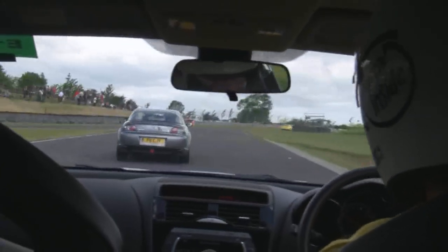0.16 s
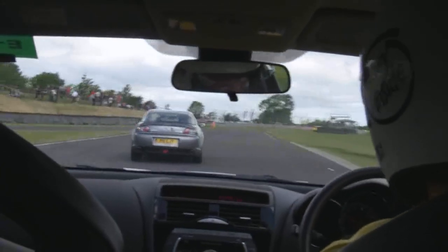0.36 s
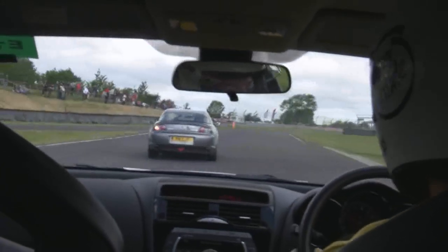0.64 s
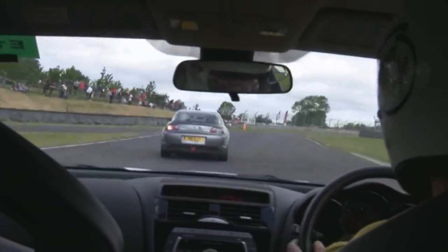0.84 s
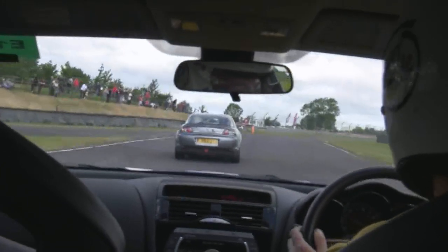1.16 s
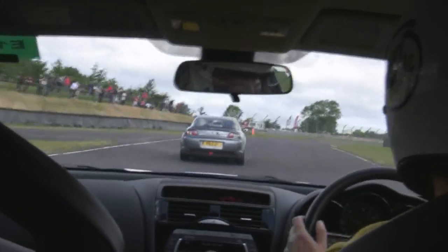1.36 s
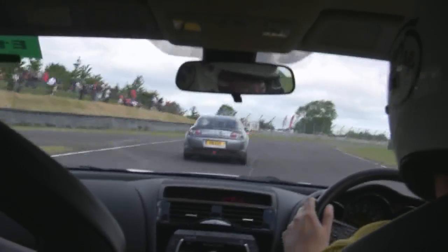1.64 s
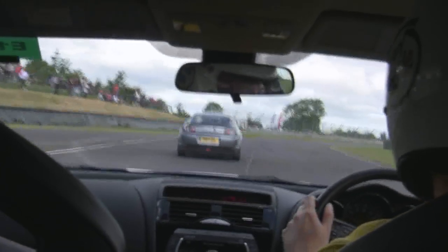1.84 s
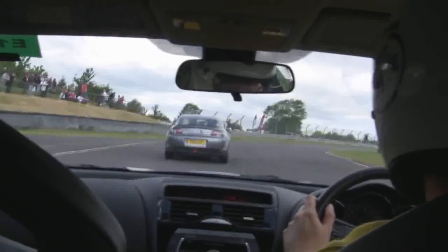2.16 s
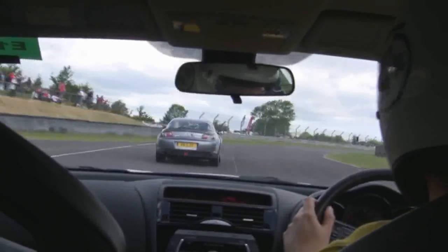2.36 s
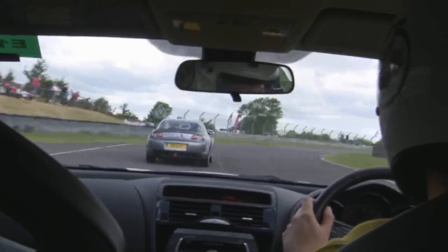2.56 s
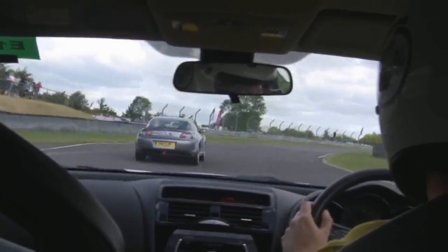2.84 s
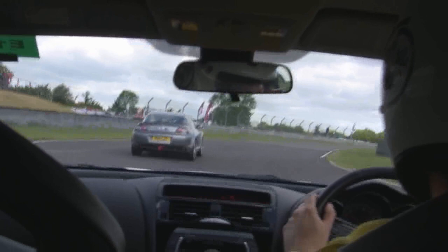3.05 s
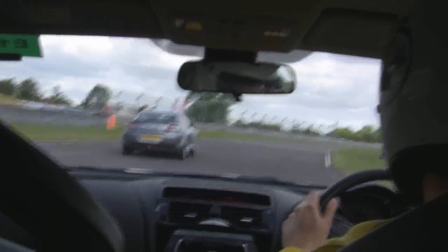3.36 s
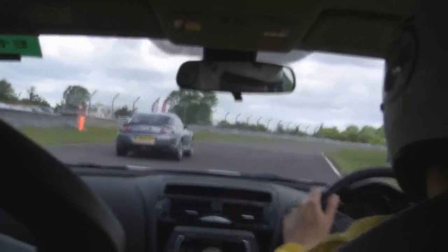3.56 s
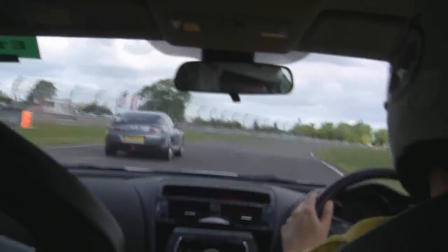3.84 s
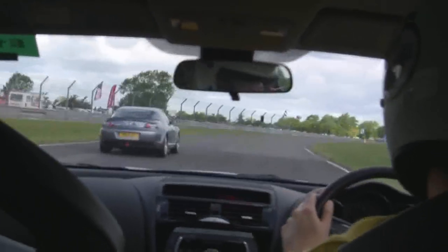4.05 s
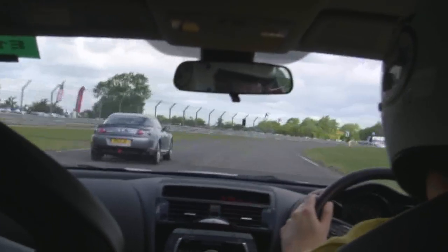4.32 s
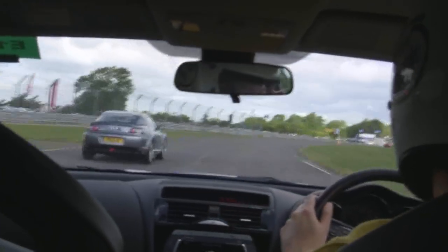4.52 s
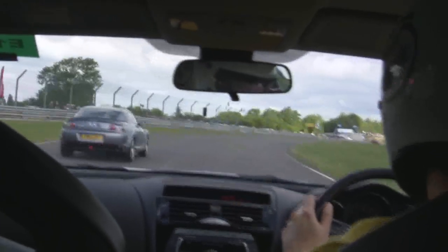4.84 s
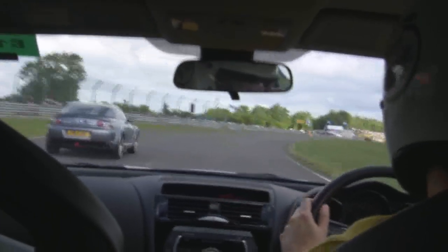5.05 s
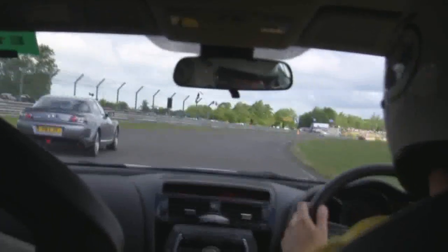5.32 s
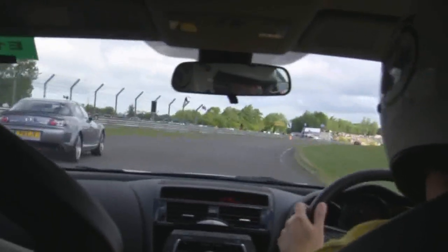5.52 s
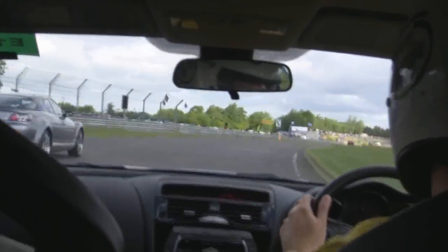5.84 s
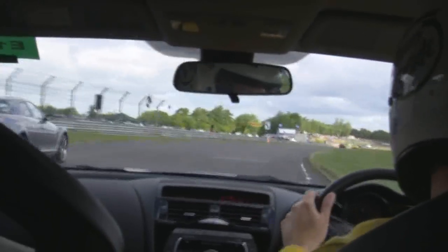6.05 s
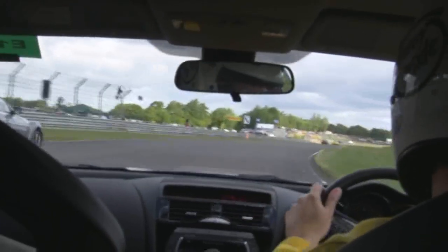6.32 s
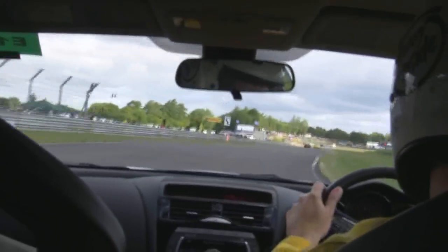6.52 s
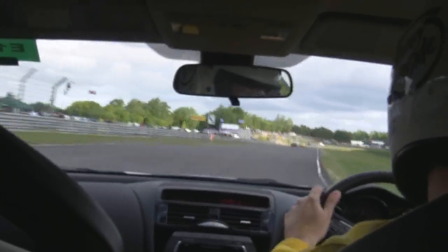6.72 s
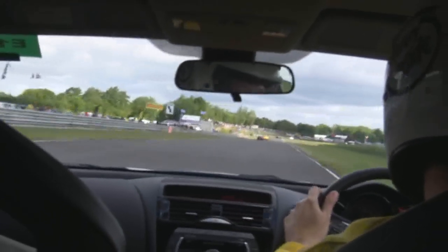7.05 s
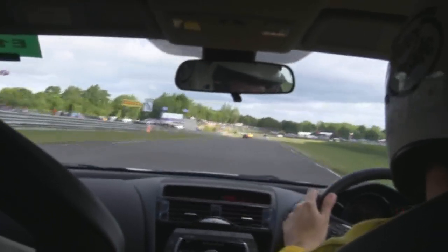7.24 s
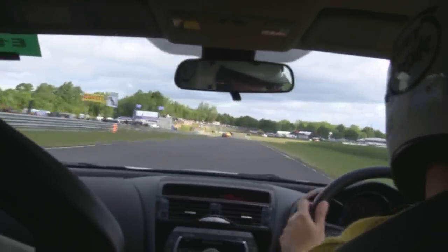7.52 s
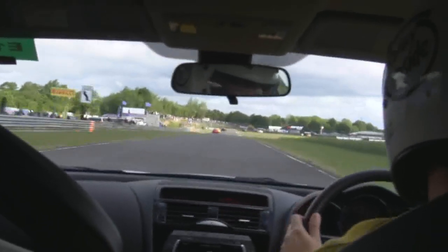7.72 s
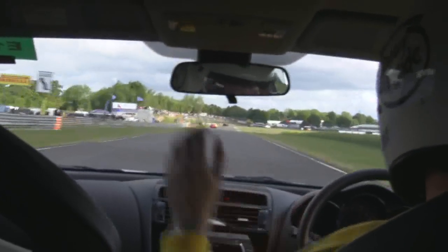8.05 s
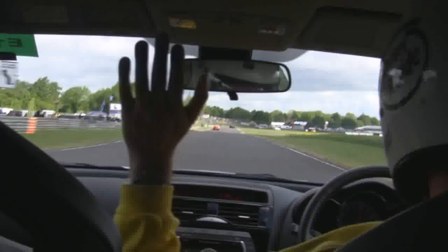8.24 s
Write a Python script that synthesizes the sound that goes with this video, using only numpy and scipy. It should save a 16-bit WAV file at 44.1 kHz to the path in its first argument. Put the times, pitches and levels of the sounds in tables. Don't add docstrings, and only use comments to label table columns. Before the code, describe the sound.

Inside the closed cabin of a car lapping a circuit, close stereo microphone behind the seats. From 0 s a smooth, low engine drone eases, then sinks sharply around 0.5-1 s as the driver lifts for a bend, leaving floor rumble and wind hiss more exposed. From about 1.1 s power returns and the pitch climbs steadily in one gear to the end, roughly two thirds higher, swelling and changing colour through resonances, with a small dip near 6.7 s. Low road boom, fluttering wheel thump and body roar grow; bumps surge near 3.6 and 5.1 s. Dry trim ticks scatter until 5.5 s, sharpest around 2.1 and 4-4.4 s. Driveline hums join around 3.2-4.5 and 6.7-7.7 s. Gusty hiss brightens around 4-5.5 s, with air thuds near 4.3 and 6.9 s. It cuts off still accelerating at about 8.4 s.

```python
import sys
import numpy as np
from scipy import signal
from scipy.fft import rfft, irfft, next_fast_len
from scipy.io import wavfile
from scipy.ndimage import uniform_filter1d

SR = 44100
rng = np.random.default_rng(int(sys.argv[2]) if len(sys.argv) > 2 else 0)


def to_linear_factor(level_db):
    exponent = np.asarray(level_db, float) / 20
    return 10 ** exponent


def file_out(sig):
    cols = np.atleast_2d(sig).T
    lim = np.clip(cols, -1, 1)
    pcm = np.round(lim * 32767).astype(np.int16)
    wavfile.write(sys.argv[1], SR, pcm)


N = 369999

# (time [s], firing rate [Hz])
ENGINE_SPEED = [(0.0, 153.7), (0.5, 158.8), (0.75, 157.8), (1.0, 153.8), (1.25, 154), (1.75, 160.5),
                (2.25, 167.9), (2.75, 174.3), (3.25, 182.8), (4.0, 195.2), (4.5, 202.3), (5.0, 208.1),
                (5.5, 215.6), (6.25, 227.5), (7.25, 243.2), (8.0, 251.8), (8.25, 255.4)]


def engine():
    # (multiple of firing rate [-], level [dB], share of the throttle change [-])
    strong_orders = [(1, -1.2, .35), (2, -0.35, .9), (3, -7.5, 1), (4, -14.5, 1)]
    # (centre [Hz], width [Hz], level [dB])
    pipe_modes = [(162.7, 36, -31.5), (192, 30.4, -23), (216.2, 14, -26.5), (229.7, 7.6, -26),
                  (255.04, 33, -20), (331.2, 36, -30), (438, 46, -22), (501.2, 51, -30), (587, 51, -32),
                  (633.3, 42, -35), (683.5, 26, -35), (753, 126, -32), (913, 8.5, -30), (972, 58, -21.5)]
    # (multiple of firing rate [-], level [dB])
    faint_orders = [(0.498, -39), (1.5, -40), (2.5, -38.5), (2.75, -41.5), (3.5, -56.5), (4.5, -52),
                    (5, -45), (6, -49.5)]
    # (centre [Hz], width [Hz], level [dB])
    cabin_modes = [(79.5, 11, -5.5), (110, 34, -9.5), (311, 34, 2), (363, 51, 5.5), (575.3, 34.4, 7),
                   (642, 11, 3.5), (764, 10, 5), (780, 13, -6), (999, 130, 1), (1087, 22, -0.5),
                   (1139, 34, 1), (1160, 110, -5.5), (1395, 350, 4.5)]
    # (middle [s], half length [s], change [dB])
    throttle_lifts = [
        (.2, 0.23, -5),
        (.75, 0.3, -14),
        (3.18, 0.064, -2.5),
        (4.63, 0.11, -2),
        (5.93, 0.12, -1),
        (6.74, .1, -4),
    ]
    hz = uniform_filter1d(curves(ENGINE_SPEED)[0], SR // 8)
    throttle_db = swells(throttle_lifts)

    out, strong_db = 0, []
    for order, db, share in strong_orders:
        pipe_gain = resonances(pipe_modes, order * hz)
        order_db = db + share * throttle_db + 20 * np.log10(pipe_gain)
        strong_db.append(order_db)
        out = out + tone(order * hz, order_db + 0.4 * order * walk(5))

    load_db = 0.22 * (uniform_filter1d(strong_db[0], SR // 2) + 18.5) + 0.8 * throttle_db
    for order, db in faint_orders:
        cabin_gain = resonances(cabin_modes, order * hz)
        out = out + cabin_gain * tone(order * hz, db + load_db + 1.8 * walk(7))
    return out


def wheels(boom_db):
    firings_per_turn = 16.05
    rate = curves(ENGINE_SPEED)[0] / firings_per_turn
    turns = np.cumsum(rate) / SR + 0.5 + 0.006 * walk(6)
    thump = 0
    for k in range(4, 19):
        gain = resonance(k * rate, 113.4, 45) ** 2 * to_linear_factor(2.2 * walk(4))
        thump = thump + gain * np.cos(2 * np.pi * k * turns + 0.5 * walk(2))
    return thump / np.std(thump) * to_linear_factor(boom_db - 2)


def road(boom_db, roar_db):
    # (frequency [Hz], density [dB per Hz])
    boom_spectrum = [(8.8, -38), (15, -6), (59, -2), (102, -9), (123, 0), (167, -2.5), (242, -9),
                     (318, -4.5), (439, -13.5), (484, -16.5), (541, -26), (700, -21.5), (910, -51),
                     (1540, -120)]
    # (frequency [Hz], density [dB per Hz])
    roar_spectrum = [(150, -30.5), (250, -10), (318, -5), (437, -13), (480, -10), (541, -15.5),
                     (678, -14.5), (1070, -16.5), (1470, -27), (1670, -30), (1960, -27.5), (2530, -31.5),
                     (6000, -52.5), (7800, -86), (13200, -120)]
    boom = rush(boom_spectrum, boom_db - 0.3, 0.39, 0.41, 8.8)
    return boom + rush(roar_spectrum, roar_db + 11.5, 0.49, 0.56, 12)


def bumps():
    # (time [s], lift of the boom [dB])
    tarmac_bumps = [(0.0, 6), (.37, 3), (1.31, 0), (1.45, 1.5), (1.92, 1.5), (2.57, 0.5), (3.01, 3),
                    (3.23, 1.5), (3.39, 2.5), (3.57, 7), (4.13, 4), (4.46, 2.5), (4.52, -3), (4.84, 2.5),
                    (5.072, 6), (5.77, -2.5), (5.93, 2.5), (6.38, 0), (6.66, 3.5), (6.94, 2.5), (7.27, 2.5),
                    (7.59, 1), (8.22, -3), (8.3, 2.5)]
    rise_s, fall_s = 0.036, 0.071
    t, lift_db = np.arange(N) / SR, 0
    for s, db in tarmac_bumps:
        lift_db = lift_db + db * np.exp(np.where(t < s, (t - s) / rise_s, (s - t) / fall_s))
    return lift_db


def wind(hiss_db):
    # (frequency [Hz], density [dB per Hz])
    hiss_spectrum = [(1180, -26), (2000, -5), (2250, -3), (2350, -5.5), (2670, -3), (3420, -10.5),
                     (5140, -14.5), (9080, -19.5), (14200, -30.5), (15200, -36)]
    # (frequency [Hz], density [dB per Hz])
    edge_spectrum = [(4000, -14.5), (6000, -1), (9000, 1), (12000, -6.5), (15500, -10)]
    # (time [s], level [dB], length [s])
    buffets = [
        (.4, -48, .04),
        (2.014, -43, 0.043),
        (2.577, -44, .03),
        (3.601, -43, 0.042),
        (4.303, -34, 0.045),
        (6.417, -45, .04),
        (6.901, -33, 0.035),
        (7.798, -38, .04),
    ]
    t = np.arange(N) / SR
    thumps = sum(to_linear_factor(db) * np.exp(-((t - s) / length) ** 2) for s, db, length in buffets)
    low = thumps * low_noise(35, 240) + to_linear_factor(-55.5) * low_noise(12, 45)
    edge_db = 1.25 * (hiss_db + 55)
    edge = rush(edge_spectrum, edge_db - 63.5, 1.4, 0.5, 50)
    return rush(hiss_spectrum, hiss_db + 9.5, 0.97, 0.4, 45) + edge + np.array([low, -low])


def gusts():
    # (middle [s], half length [s], lift of the hiss [dB])
    gust_times = [(0.0, 0.0085, 0.5), (0.297, 0.3, 5), (0.674, 0.12, 5), (.94, 0.019, 0.5),
                  (1.05, 0.032, 4), (1.287, 0.025, 2.5), (1.882, 0.012, 6), (2.039, 0.039, 3),
                  (2.243, .09, 2), (2.65, 0.091, -2), (3.03, 0.029, 1), (3.258, 0.02, 0.5),
                  (3.577, 0.089, 5), (3.79, .03, 5), (4.073, 0.097, 5.5), (4.295, 0.09, 7.5),
                  (4.44, 0.042, 7.5), (4.787, .07, 7), (4.93, 0.061, 5.5), (5.115, 0.22, 3.5),
                  (6.275, .05, -1), (8.25, 0.035, 0.5), (5.49, 0.092, 7), (6.006, 0.15, 5),
                  (6.517, 0.23, 1.5), (6.885, 0.16, 6), (7.5, 0.11, 2.5), (7.723, .08, 4), (8.022, .1, 3.5)]
    return swells(gust_times)


def hums():
    # (start [s], length [s], first pitch [Hz], last
    # pitch [Hz], level [dB])
    gliding_hums = [(1.95, 1.1, 1487, 1622, -60), (.7, .4, 204, 207, -38), (1.1, .65, 212, 209, -33),
                    (2.7, .75, 341, 350, -32), (3.2, 1.28, 347, 369, -27), (5.35, .5, 366, 366.5, -31),
                    (6.72, .97, 372.5, 381, -22.5), (7.25, .6, 189.5, 192, -28),
                    (8.1, .35, 192, 194, -23), (6.3, .25, 80, 81, -29), (6.8, .25, 80, 82, -28),
                    (7.9, .35, 81, 83, -28)]
    rise_share, fade_s, waver_db = 0.51, 0.098, 1.2
    t, out = np.arange(N) / SR, 0
    for s, length, first_hz, last_hz, db in gliding_hums:
        rise = (t - s) / (rise_share * length)
        fall = (s + length - t) / fade_s
        fade = np.clip(np.minimum(rise, fall), 0, 1)
        hz = np.interp(t, [s, s + length], [first_hz, last_hz])
        out = out + fade * tone(hz, db + waver_db * walk(3))
    return out


def ticks():
    # (time [s], peak level [dB], centre [Hz])
    trim_ticks = [(0.224, -46, 5010), (0.5472, -47, 4520), (0.609, -56, 4520), (0.6976, -42, 4620),
                  (0.9356, -49, 4780), (0.9996, -50, 4760), (1.041, -46, 4530), (1.2864, -55, 4660),
                  (1.826, -49, 4997), (1.8721, -56.5, 4500), (2.0624, -38.5, 6600), (2.1964, -50, 4610),
                  (2.4049, -47, 4934), (2.459, -50, 4620), (3.0294, -50, 4556), (3.605, -43, 2600),
                  (3.7894, -53, 4730), (4.059, -39, 4900), (4.1333, -42, 4860), (4.329, -40, 4610),
                  (4.3897, -36, 4627), (4.83, -44, 4570), (5.4894, -36.5, 4730)]
    t60_s = 0.039
    out, t = np.zeros((2, N + 4410)), np.arange(4410) / SR
    for s, db, hz in trim_ticks:
        burst = rng.standard_normal((3, len(t))) * to_linear_factor(-60 * t / t60_s)
        band = signal.butter(2, [hz * 0.44, min(hz * 1.3, 15000)], "band", fs=SR, output="sos")
        ring = signal.sosfilt(band, burst[0] + 0.35 * burst[1:])
        start = int(s * SR)
        out[:, start:start + len(t)] += ring / np.abs(ring).max() * to_linear_factor(db)
    return out[:, :N]


def tone(hz, db):
    # (frequency [Hz], port lead [rad])
    across_cabin = [(160, .08), (200, .05), (232, 0.19), (255, .03), (330, .1), (430, .03), (480, .12),
                    (520, .08), (660, 0.31), (760, .1), (1000, .1), (1120, 0.4), (1400, 0.33)]
    turns = np.cumsum(hz) / SR + rng.random() + 0.016 * walk(25)
    lead = shape(across_cabin, hz) * (1 + 0.25 * walk(6.8))
    wave = np.sin(2 * np.pi * turns + np.array([lead, -lead]))
    return np.sqrt(2) * to_linear_factor(db + 0.84 * walk(15)) * wave


def rush(spectrum, level_db, common_db, own_db, rate):
    # (centre [Hz], width [Hz], lift [dB])
    panel_modes = [(85.5, 7.1, 15.5), (104, 12, -8.5), (110, 9.1, 7), (146, 12, -2.5), (294, 14, 5),
                   (570, 37, 4.5), (821, 42, 4), (1512, 340, 6.5), (1786, 28, 6.5), (1945, 50, 5.5),
                   (2213, 41, 7), (2565, 40, -2.5), (4370, 56, 6), (5100, 160, 4)]
    # (frequency [Hz], side minus mid [dB])
    port_spread = [(60, -22), (110, -20), (200, -20.5), (380, -18.5), (690, -13.5), (1280, -8.5),
                   (2360, -7), (4350, -4.5), (8030, -4.5), (14800, -2.5)]
    size = next_fast_len(N)
    hz = np.arange(size // 2 + 1) * SR / size
    low_hz, high_hz = spectrum[0][0], spectrum[-1][0]
    panel_db = sum(db * resonance(hz, f, w) ** 2 for f, w, db in panel_modes)
    gain = to_linear_factor(shape(spectrum, hz) + panel_db) * (hz > low_hz) * (hz < high_hz)
    mid, side = rfft(rng.standard_normal((2, size))) * gain
    side = to_linear_factor(shape(port_spread, hz)) * side
    pair = np.array([mid + side, mid - side])
    place, common, out = 2 * np.log2(hz + 1), walk(rate), 0
    for band in range(int(2 * np.log2(low_hz)), int(2 * np.log2(high_hz)) + 2):
        window = np.cos(np.pi / 2 * np.clip(place - band, -1, 1)) ** 2
        part = irfft(pair * window, size)[:, :N]
        out = out + part * to_linear_factor(common_db * common + own_db * walk(rate))
    return out / np.std(out) * to_linear_factor(level_db)


def low_noise(low_hz, high_hz):
    band = signal.butter(2, [low_hz, high_hz], "band", fs=SR, output="sos")
    noise = signal.sosfilt(band, rng.standard_normal(N))
    return noise / np.std(noise)


def with_speed(slow_db, db_per_doubling):
    slow_hz = 156
    return slow_db + db_per_doubling * np.log2(curves(ENGINE_SPEED)[0] / slow_hz)


def swells(events):
    t = np.arange(N) / SR
    return sum(db * np.exp(-np.abs((t - s) / half) ** 3.5) for s, half, db in events)


def walk(rate):
    hold = int(SR / rate)
    steps = np.repeat(rng.standard_normal(N // hold + 1), hold)
    return 1.58 * uniform_filter1d(uniform_filter1d(steps, hold), hold)[:N]


def resonance(hz, centre_hz, width):
    return 1 / np.sqrt(1 + (2 * (hz - centre_hz) / width) ** 2)


def resonances(modes, hz):
    return sum(to_linear_factor(db) * resonance(hz, f, w) ** 3 for f, w, db in modes)


def shape(points, hz):
    f, value = np.transpose(points)
    return np.interp(np.log(hz + 1), np.log(f + 1), value)


def curves(points):
    s, *columns = np.transpose(points)
    return [np.interp(np.arange(N) / SR, s, c) for c in columns]


def scene():
    gust_db = gusts()
    boom_db = with_speed(-27.5, 8.04) + bumps()
    roar_db = with_speed(-51.5, 15.55) + 0.28 * gust_db
    hiss_db = with_speed(-72, 23.45) + gust_db
    return engine() + wheels(boom_db) + road(boom_db, roar_db) + wind(hiss_db) + hums() + ticks()


def band_limit(x):
    return signal.sosfilt(signal.butter(12, 15400, fs=SR, output="sos"), x)


def record(dry):
    # (frequency [Hz], left minus right [dB], left lead [rad])
    port_mismatch = [(30, -1, 0.06), (300, -0.5, -0.016), (1000, -0.2, 0.092), (2000, 0.7, 0.3),
                     (5000, .7, 0.55), (12000, 0, .4)]
    size = next_fast_len(N)
    hz = np.arange(size // 2 + 1) * SR / size
    f, db, lead = np.transpose(port_mismatch)
    half = to_linear_factor(shape(np.c_[f, db], hz) / 2) * np.exp(0.5j * shape(np.c_[f, lead], hz))
    mix = irfft(rfft(dry, size) * np.array([half, 1 / half]), size)[:, :N]
    return band_limit(mix)


dry = scene()
out = record(dry)
file_out(out)
```